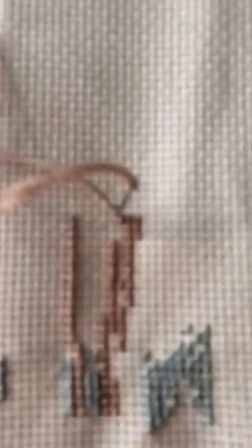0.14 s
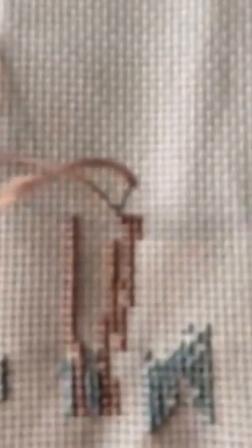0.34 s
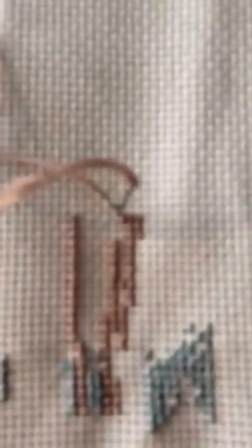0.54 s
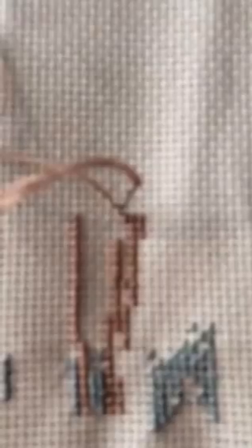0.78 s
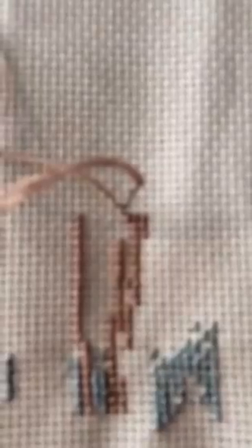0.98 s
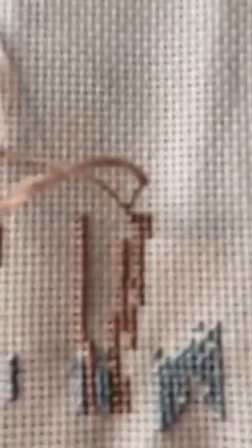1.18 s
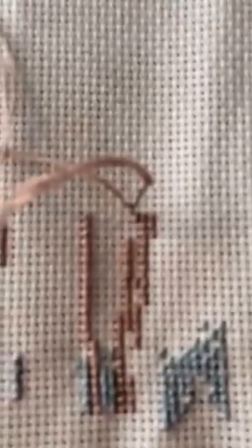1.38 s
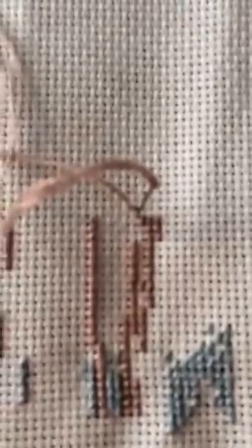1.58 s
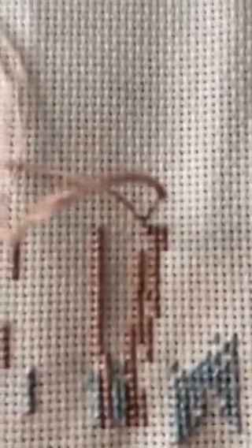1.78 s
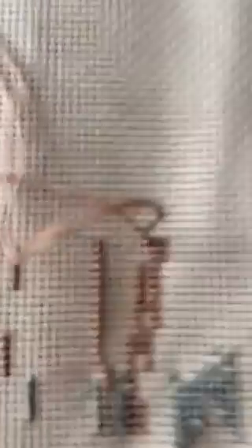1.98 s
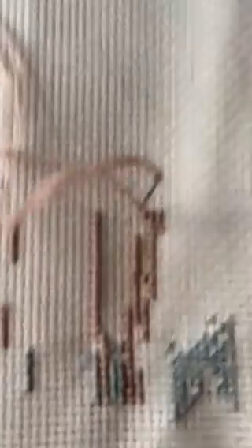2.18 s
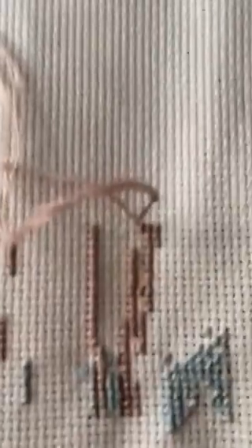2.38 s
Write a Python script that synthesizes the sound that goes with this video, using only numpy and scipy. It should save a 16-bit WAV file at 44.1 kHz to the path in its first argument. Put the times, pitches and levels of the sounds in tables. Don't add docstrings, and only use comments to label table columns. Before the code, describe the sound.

Embroidery thread is yanked through taut cloth in one bright snap and tiny crackling rasp, after almost two seconds of near-silent room hush; a brief faint echo follows. Close phone microphone, small quiet room.

```python
import sys
import numpy as np
from scipy import signal
from scipy.fft import rfft, irfft
from scipy.io import wavfile
from scipy.ndimage import uniform_filter1d

SR = 44100
rng = np.random.default_rng(int(sys.argv[2]) if len(sys.argv) > 2 else 0)


def unload_audio(sound):
    columns = np.transpose(np.atleast_2d(sound))
    steps = np.round(np.clip(columns, -1, 1) * 32767)
    wavfile.write(sys.argv[1], SR, steps.astype(np.int16))


def attenuation_scalar(level_db):
    decades = np.asarray(level_db, float) / 20
    return 10 ** decades


N = 107339
SNAP_S = 1.931
TIGHTENS_S = 1.988


def band(x, hz, width):
    return signal.lfilter(*signal.iirpeak(hz, hz / width, fs=SR), x)


def unit(x):
    return x / np.sqrt(np.mean(x ** 2))


def ring(x, hz, t60):
    pole = np.exp(2j * np.pi * hz / SR - np.log(1000) / (max(t60, .002) * SR))
    return signal.lfilter([1], [1, -pole], x).imag


def hit(when_s):
    return 1. * (np.arange(N) == int(when_s * SR))


def ticks():
    ticks_per_s, scatter_db = 9000, 3
    on = rng.random(N) < ticks_per_s / SR
    sign = np.sign(rng.standard_normal(N))
    return unit(on * sign * attenuation_scalar(scatter_db * rng.exponential(size=N)))


def needle(t):
    # t/s, level/dB
    snap_events = [
        (1.9087, -52.5),
        (1.9215, -49.5),
        (1.931, -3.5),
        (1.9335, -18.5),
        (2.0048, -21.5),
    ]
    # f/Hz, level/dB, t60/s
    needle_modes = [(980, -18.5, .04), (1990, -11, 0.024), (2530, -17.5, .02), (3183, -7, 0.014),
                    (4216, -6.5, .018), (4580, -10.5, 0.045), (6180, 1.64, .037), (6797, -2.5, .014),
                    (7640, -14, 0.017), (8130, -19, 0.02), (10210, -11, 0.0068), (13900, -21.5, .007)]
    creep_from_s, creep_db, creep_db_per_s = 1.9, -65, 499.5
    push = np.zeros(N)
    for s, db in snap_events:
        push[int(s * SR)] += attenuation_scalar(db)
    straining = (t > creep_from_s) * (t < SNAP_S)
    creep = straining * attenuation_scalar(creep_db + creep_db_per_s * np.clip(t - creep_from_s, 0, .04))
    push = push + creep * ticks() / 10
    push = np.convolve(push, np.hanning(7) / 2)[:N] + np.diff(push, prepend=0)
    sound = np.zeros(N)
    for k, (hz, db, t60) in enumerate(needle_modes):
        sound += (-1) ** k * attenuation_scalar(db) * ring(push, hz, t60)
    return sound


def catches(t):
    # t/s, level/dB, length/s
    catch_events = [
        (1.9418, -9.5, .0012),
        (1.9453, -22.5, .004),
        (1.9553, -18, 0.0025),
        (1.9663, -24.5, .003),
        (1.9708, -23.5, .0015),
        (1.9735, -22, 0.0043),
        (1.986, -23, 0.0035),
        (1.9905, -25, 0.0041),
        (1.996, -25, 0.0038),
        (2.004, -29.5, 0.0018),
    ]
    # f/Hz, width/Hz, level/dB
    fibre_bands = [(1880, 1500, -2.5), (3540, 930, -9), (4720, 700, -7.5), (5200, 750, -10),
                   (6800, 740, -6), (9380, 1200, 0.5), (11100, 1000, -4), (15000, 600, -16)]
    first_tick_db = 16
    spray = np.zeros(N)
    for s, db, length in catch_events:
        spray += attenuation_scalar(db) * (t >= s) * np.exp(-np.maximum(t - s, 0) / length)
    clicks = ticks() * spray
    for s, db, _ in catch_events:
        clicks[int(s * SR)] = attenuation_scalar(db + first_tick_db)
    sound = np.zeros(N)
    for hz, width, db in fibre_bands:
        coloured = band(band(clicks, hz, width), hz, 2 * width)
        sound += attenuation_scalar(db) * coloured * np.sqrt(SR / 8 / width)
    return sound - band(sound, 13300, 3000)


def drag(t):
    # t/s, level/dB
    drag_curve = [
        (1.929, -38.5),
        (1.938, -23),
        (1.951, -24),
        (1.964, -31),
        (1.975, -26),
        (1.988, -30.5),
        (1.997, -23.5),
        (2.002, -29),
        (2.006, -21),
    ]
    # f/Hz, t60/s, level when slack/dB, level when taut/dB
    cloth_modes = [(540, 0.019, -13.5, -20.5), (668, 0.022, -10, -19.5), (920.6, 0.05, 0, -11.5),
                   (1160, .02, -11, -29), (1448, .03, -8, -11), (1691, 0.086, -10.5, -2.5),
                   (2086, 0.036, -6.5, -17.5), (2485, .015, -12.5, -7.5), (2742, 0.014, -10, 2),
                   (3295, 0.0098, -7, -0.5), (4330, .016, -9.5, -6), (4640, 0.0067, -13, -16.5),
                   (5060, 0.0091, -14.5, -14), (7550, .01, -20.5, -16.5)]
    let_go_s, tighten_time_s = .003, .003
    s, db = np.array(drag_curve).T
    fade = np.exp(-np.maximum(t - s.max(), 0) / let_go_s)
    force = ticks() * attenuation_scalar(np.interp(t, s, db, left=-120)) * fade
    taut = .5 + .5 * np.tanh((t - TIGHTENS_S) / tighten_time_s)
    sound = np.zeros(N)
    for k, (hz, t60, slack, tight) in enumerate(cloth_modes):
        shaking = ring(force * attenuation_scalar(slack + (tight - slack) * taut), hz, t60)
        sound += shaking * np.sqrt(14 / (t60 * SR)) * (-1) ** k
    return sound


def hoop_thud():
    return attenuation_scalar(-48.5) * ring(hit(SNAP_S), 190, 0.16)


def hand_jolt(t):
    jolt_s, length_s, hz, db = 2.035, 0.032, 52, -52.5
    swell = np.exp(-((t - jolt_s) / length_s) ** 2)
    return attenuation_scalar(db) * swell * np.sin(2 * np.pi * hz * t)


def room(x):
    # f/Hz, t60/s, level/dB
    room_bands = [(680, 0.16, -28), (1690, 0.12, -20), (2600, 0.38, -27.5), (5500, 0.43, -31.5),
                  (10000, .16, -35.5)]
    t = np.arange(SR // 2) / SR
    tail = np.zeros(len(t))
    for hz, t60, db in room_bands:
        noise = unit(band(rng.standard_normal(len(t)), hz, hz * .9))
        tail += attenuation_scalar(db - 60 * t / t60) * noise * np.sqrt(14 / (t60 * SR))
    tail = tail * np.clip(t / 0.0092, 0, 1)
    return signal.fftconvolve(x, tail)[:N]


def far_tap():
    return attenuation_scalar(-53) * ring(hit(.637), 900, 0.015)


def cloth_brush(t):
    brush_s, length_s, db = 2.37, .045, -73
    swell = np.exp(-((t - brush_s) / length_s) ** 2)
    return attenuation_scalar(db) * swell * unit(band(rng.standard_normal(N), 7000, 9700))


def appliance(t):
    # f/Hz, width/Hz, level/dB
    hum_bands = [(52, 36, -74.5), (121.8, 7.3, -73.5), (345, 7, -78.5)]
    fade_db_per_s = -3.5
    hum = np.zeros(N)
    for hz, width, db in hum_bands:
        hum += attenuation_scalar(db) * unit(band(band(rng.standard_normal(N), hz, width), hz, 2 * width))
    return hum * attenuation_scalar(fade_db_per_s * (t - 1.5))


def air():
    # f/Hz, level/dB
    air_curve = [(45, -7.5), (110, -3), (300, -11), (680, -17), (1350, -25), (2900, -29), (4300, -34),
                 (15500, -39.5)]
    air_db, low_hz = -62.5, 41
    f = np.maximum(np.fft.rfftfreq(N, 1 / SR), 1)
    hz, db = np.array(air_curve).T
    colour = attenuation_scalar(np.interp(np.log(f), np.log(hz), db))
    low_cut = np.minimum(f / low_hz, 1) ** 3
    hiss = irfft(rfft(rng.standard_normal(N)) * colour * low_cut, N)
    return attenuation_scalar(air_db) * unit(hiss)


def street():
    swells_per_s, swell_db = 7, -84
    k = int(SR / swells_per_s)
    drift = uniform_filter1d(np.repeat(rng.standard_normal(N // 1000), k)[:N], k)
    return attenuation_scalar(swell_db + 4 * drift) * unit(band(rng.standard_normal(N), 2100, 1800))


def scene():
    t = np.arange(N) / SR
    snap, fibres, cloth = needle(t), catches(t), drag(t)
    needle_room_db, taut_room_db = -11.5, -6.5
    to_room = fibres + attenuation_scalar(needle_room_db) * snap + attenuation_scalar(taut_room_db * (t > TIGHTENS_S)) * cloth
    pull = snap + fibres + cloth + room(to_room)
    low_cut = signal.butter(3, 420, "high", fs=SR, output="sos")
    pull = signal.sosfilt(low_cut, pull)
    small = hoop_thud() + hand_jolt(t) + far_tap() + cloth_brush(t)
    background = appliance(t) + air() + street()
    return (pull + small + background)[None]


def top_cut(x):
    return signal.sosfilt(signal.butter(12, 16640, fs=SR, output="sos"), x)


def record(dry):
    drive, top_hz = .9, 15350
    rounded = np.tanh(drive * dry) / drive
    mix = signal.sosfilt(signal.ellip(8, .2, 60, top_hz, fs=SR, output="sos"), rounded)
    return top_cut(mix)


dry = scene()
out = record(dry)
unload_audio(out)
```